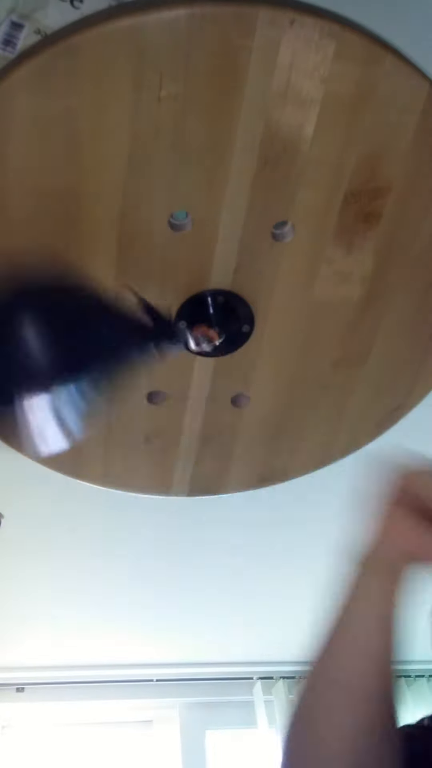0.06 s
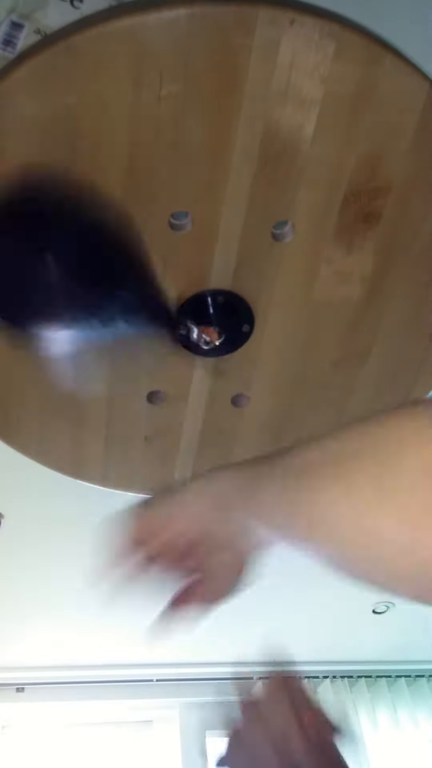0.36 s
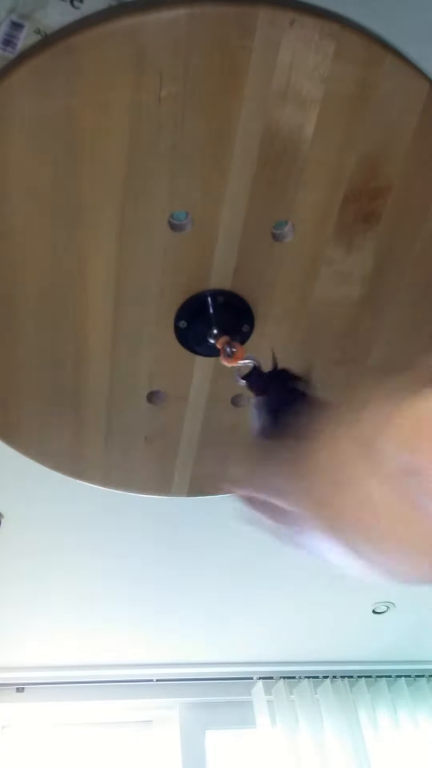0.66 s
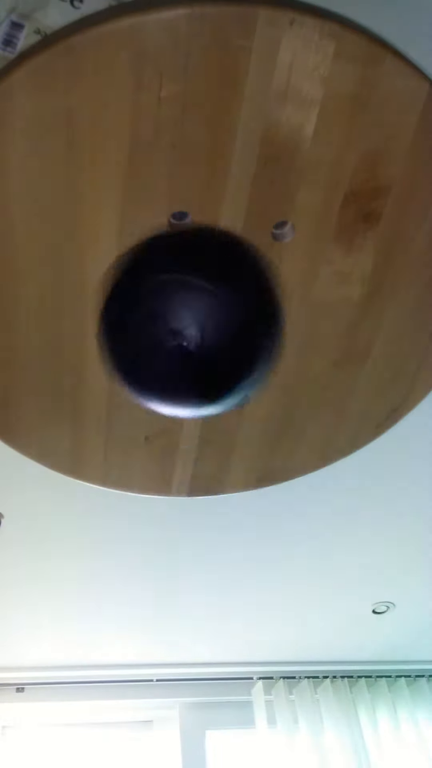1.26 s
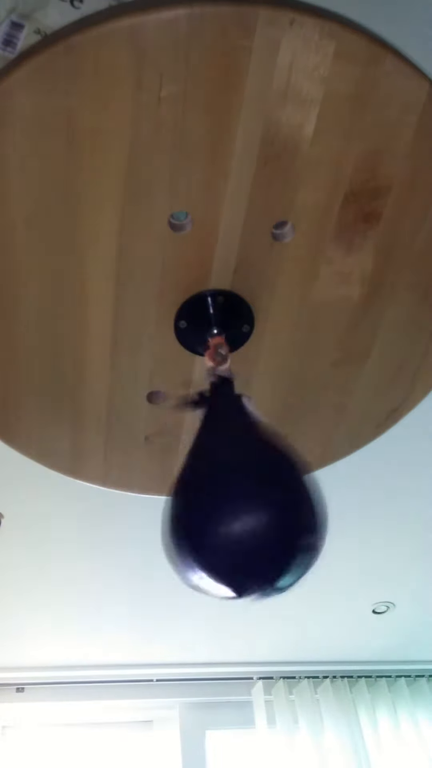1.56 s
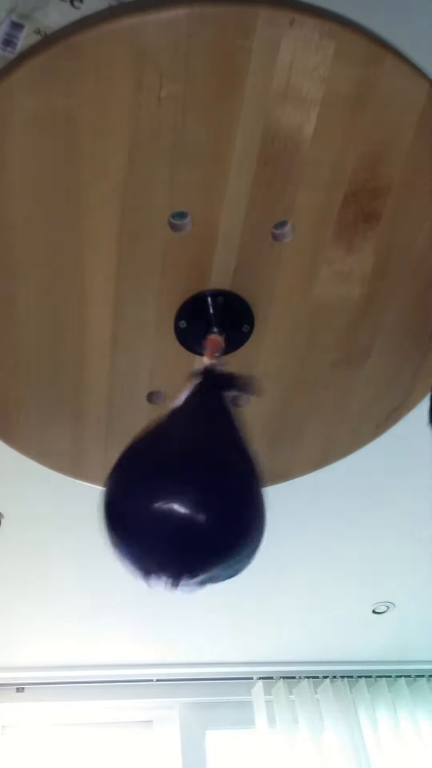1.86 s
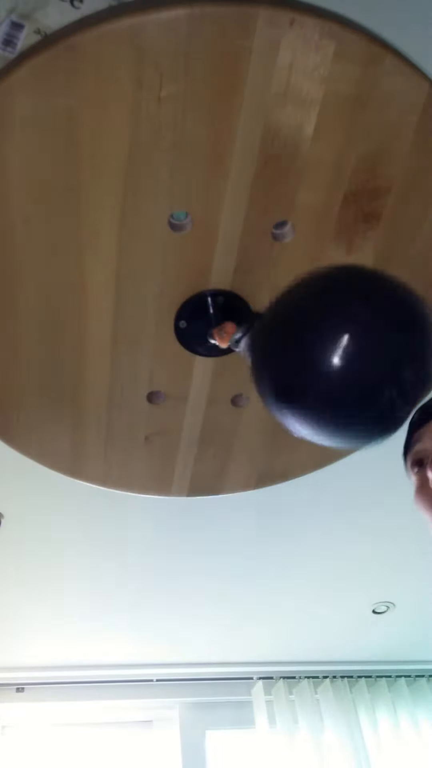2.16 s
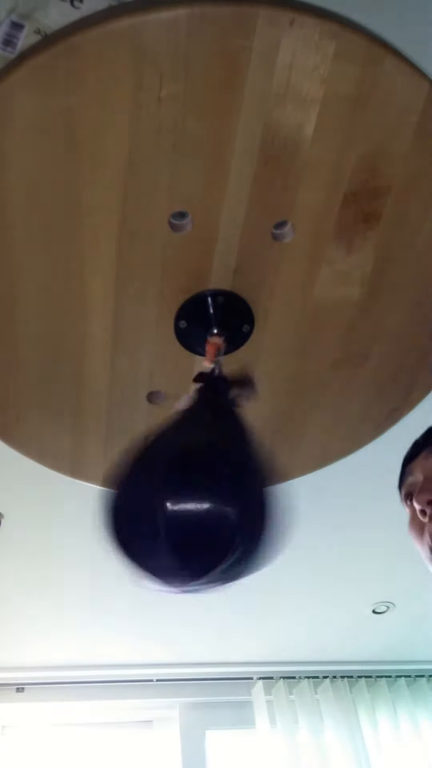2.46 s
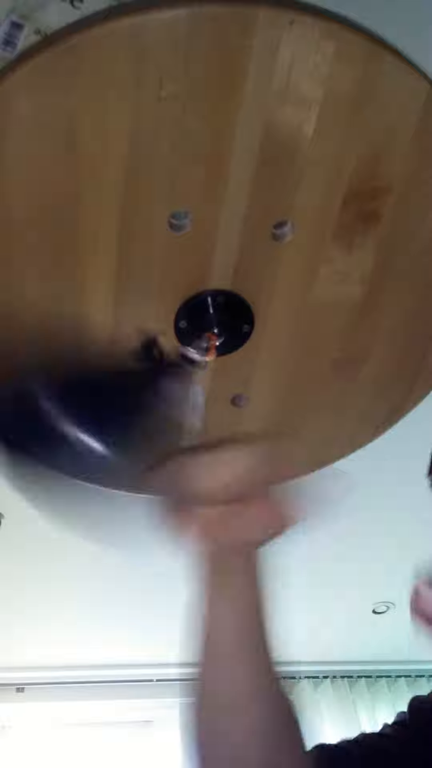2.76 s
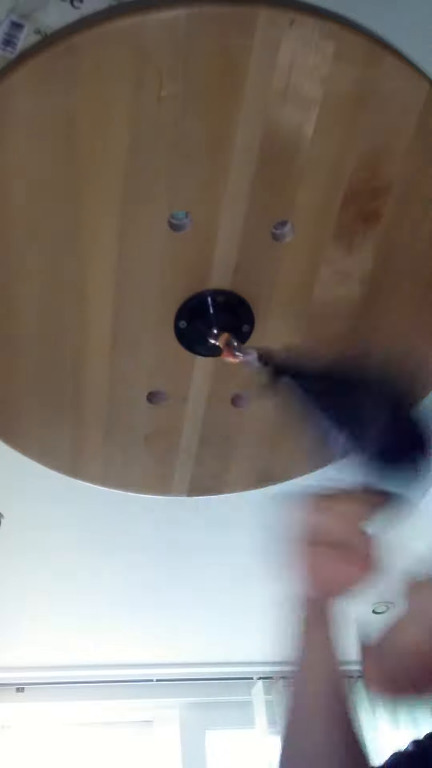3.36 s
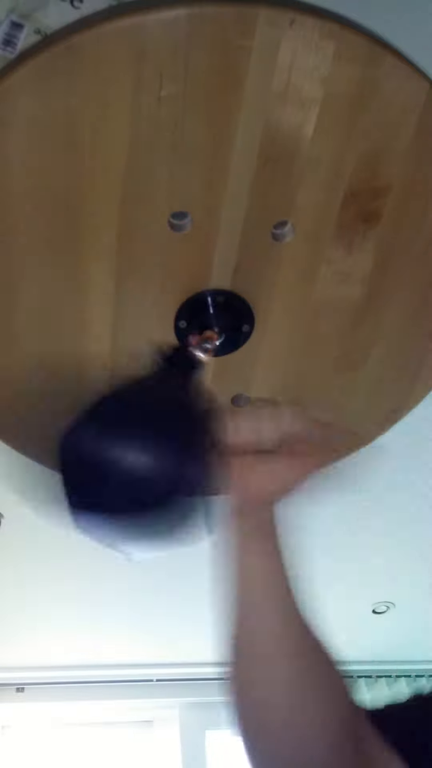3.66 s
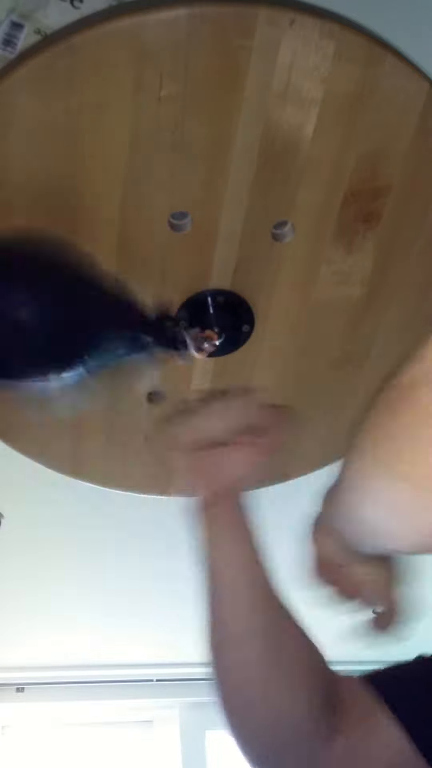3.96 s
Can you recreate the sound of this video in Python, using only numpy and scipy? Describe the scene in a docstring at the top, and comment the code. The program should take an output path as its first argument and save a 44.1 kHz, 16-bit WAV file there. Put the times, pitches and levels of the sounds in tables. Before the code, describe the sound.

Close, rapid punches drive a leather speed bag into a booming wooden board, its metal swivel clinking. The hits stop while the bag swishes softly, then a second run rings around the hard-walled room.

```python
"""In a hard-walled room, a leather speed bag is punched and rebounds under a round wooden board,
close to the microphone. Each blow slaps the leather, thumps the air in the bag, jolts the steel
swivel and sets the board booming, and the walls answer. In the pause between two runs of blows
the bag swings freely with a soft swish over the room's background."""
import sys
import numpy as np
from scipy import signal
from scipy.fft import rfft, irfft, next_fast_len
from scipy.io import wavfile
from scipy.ndimage import uniform_filter1d

SR = 44100
rng = np.random.default_rng(int(sys.argv[2]) if len(sys.argv) > 2 else 0)


def waveform_to_disk(signal):
    """Save audio, clipped to [-1, 1], as 16-bit WAV at the path in sys.argv[1]."""
    frames = np.transpose(np.atleast_2d(signal))
    scaled = np.clip(frames, -1, 1) * 32767
    samples = np.round(scaled).astype(np.int16)
    wavfile.write(sys.argv[1], SR, samples)


N = 176400  # 4 seconds


def amp(db):
    """Turns decibels into a number to multiply a sound by."""
    return 10 ** (np.asarray(db) / 20)


def look_up(points, hz):
    """Reads between the rows of a (frequency, value) table, giving each octave equal space."""
    row_hz, values = np.transpose(points)
    return np.interp(np.log(hz + 1), np.log(row_hz + 1), values)


def add(mix, start_s, sound):
    """Mixes a sound in at its start time."""
    part = mix[:, max(round(start_s * SR), 0):][:, :sound.shape[-1]]
    part += sound[..., :part.shape[1]]


def colour(x, points):
    """Filters by a (frequency [Hz], level [dB]) table without ringing ahead of the sound."""
    size = next_fast_len(x.shape[-1] + 4096)
    hz = abs(np.fft.fftfreq(size, 1 / SR))
    log_gain = np.log(amp(look_up(points, hz)))
    response = np.exp(np.conj(signal.hilbert(log_gain)))[:size // 2 + 1]
    return irfft(rfft(x, size) * response, size)[..., :x.shape[-1]]


def ring(tones, t, detune=0, spread_db=0):
    """Dying tones, with optional chance in pitch and level. A fade time is the time to drop 60 dB."""
    chance = rng.standard_normal((len(tones), 2))
    return sum(amp(db + spread_db * louder - 60 * t / fade_s)
               * np.sin(2 * np.pi * hz * (1 + detune * higher) * t)
               for (hz, db, fade_s), (louder, higher) in zip(tones, chance))


# How alike the two ears' sounds are: (frequency [Hz], likeness [0 to 1])
EAR_LIKENESS = [(150, 0.89), (400, 0.96), (1500, 0.089)]

def stereo_noise(size):
    """Noise that is nearly the same left and right in the bass, but not in the treble."""
    left, other = rfft(rng.standard_normal((2, size)))
    same = np.clip(look_up(EAR_LIKENESS, np.fft.rfftfreq(size, 1 / SR)), -1, 1)
    right = same * left + np.sqrt(1 - same ** 2) * other
    return irfft(np.array([left, right]), size)


# Tone of the room's background: (frequency [Hz], level [dB])
AIR_TONE = [(50, -5.5), (215, -9.5), (278, 2), (340, -6), (520, -9.5), (800, -6.5), (1400, -17.5),
            (2100, -16), (5000, -28)]

def room_air():
    """Steady room air with a soft low drone."""
    return amp(-21) * colour(stereo_noise(N), AIR_TONE)


# Swishes of the bag on its swivel: (time of peak [s], width [s], level [dB])
SWINGS = [(1.84, 0.055, -35.5), (2.32, 0.045, -39), (2.55, 0.24, -42.5)]
# Tone of a swish: (frequency [Hz], level [dB])
SWISH_TONE = [(2000, -25), (8000, -6.5), (16000, -7.5)]

def swinging_bag():
    """Soft rubbing swells and fades while the bag swings freely."""
    t = np.arange(N) / SR
    swells = sum(amp(db) * np.exp(-((t - peak_s) / width) ** 2 / 2) for peak_s, width, db in SWINGS)
    return colour(stereo_noise(N), SWISH_TONE) * swells


# Jolts that make the swivel chatter: (time [s], pitch [Hz], level [dB])
SWIVEL_JOLTS = [(0.443, 9560, -7), (3.3315, 8540, -18.5)]

def swivel_chatter():
    """A quick run of tiny contacts rings the steel."""
    chatter_s, steel_fade_s = 0.002, 0.0056
    t, out = np.arange(SR // 20) / SR, np.zeros((2, N))
    shape = np.exp(-(t / chatter_s) ** 2)
    for start_s, hz, db in SWIVEL_JOLTS:
        contacts = rng.standard_normal(len(t)) * shape
        chatter = signal.fftconvolve(contacts, ring([(hz, 0, steel_fade_s)], t))
        add(out, start_s, amp(db) * chatter * np.linalg.norm(shape) / np.linalg.norm(chatter))
    return out


# Blows that leave the wood ringing: (time [s], pitch [Hz], level [dB])
RINGING_BLOWS = [(0.03, 710, -26), (0.3525, 938, -25), (0.838, 812, -22), (1.054, 890, -21),
                 (2.944, 874, -20.5), (3.083, 720, -24.5), (3.374, 815, -24.5), (3.449, 920, -24)]
# Tones in each ring: (multiple of the pitch [ratio], level [dB], fade time [s])
WOOD_TONES = [(1, 3.5, 0.21), (0.92, -0.5, 0.16)]

def wood_rings():
    """Short wooden tones from the board; the place of contact sets the pitch."""
    t, out = np.arange(SR // 2) / SR, np.zeros((2, N))
    for start_s, hz, db in RINGING_BLOWS:
        tones = [(hz * ratio, db + tone_db, fade_s) for ratio, tone_db, fade_s in WOOD_TONES]
        add(out, start_s, ring(tones, t, spread_db=1.2))
    return out


# Where the wood knock, leather slap and swivel clink sit, in that order: (frequency [Hz])
KNOCK_SLAP_CLINK_HZ = [1100, 3800, 9000]
# How long the echo lasts: (frequency [Hz], fade time [s])
ECHO_FADE = [(200, 0.9), (1000, 0.38), (3000, 0.41)]

def room_echo(t, echo_db, thump_db, knock_db, clink_db):
    """Sound scatters near the board, then the walls answer with a patchy tail, longest in the bass."""
    walls_s, hold_s = 0.012, 0.0059  # when the walls answer; how long the room fills before it fades
    hz, times, spectrum = signal.stft(stereo_noise(len(t)), SR, nperseg=256)
    patches = uniform_filter1d(rng.standard_normal(spectrum.shape[1:]), size=3, axis=0)
    patches = uniform_filter1d(patches, size=8, axis=1)  # smooth in pitch, then in time
    fading_s = np.hypot(times, hold_s) - hold_s
    level_db = 2.5 * patches / patches.std() - 60 * fading_s / look_up(ECHO_FADE, hz)[:, None]
    tail = signal.istft(spectrum * amp(level_db), SR, nperseg=256)[1][:, :len(t)]
    build_up = np.where(t < walls_s, amp(-3.5) * np.sqrt(t / walls_s), 1)
    # The blow's thump (at 300 Hz), knock and clink each tint the echo.
    tint_db = [0.63 * (thump_db - echo_db), 0.19 * (knock_db - echo_db), 0, 0.52 * (clink_db - echo_db)]
    tint = list(zip([300] + KNOCK_SLAP_CLINK_HZ, tint_db))
    return amp(echo_db + 1) * colour(tail * build_up, tint)


def crack(t, knock_db, slap_db, clink_db):
    """Wood, leather and swivel snap for a few milliseconds."""
    rise_s, fall_s = 0.00033, 0.0041
    shape = (1 - np.exp(-t / rise_s)) / (1 + (t / fall_s) ** 3)
    burst = stereo_noise(len(t)) * shape
    burst *= np.linalg.norm(shape) / np.linalg.norm(burst, axis=1, keepdims=True)
    return amp(9.5) * colour(burst, list(zip(KNOCK_SLAP_CLINK_HZ, [knock_db, slap_db, clink_db])))


# Deep tones of the board and its mount: (pitch [Hz], level [dB], fade time [s])
BOOM_TONES = [(63.6, 0, 0.61), (76.2, 0, 0.88), (101.66, 0.5, 0.72)]
# Tones of the bag and the board's middle range: (pitch [Hz], level [dB], fade time [s])
THUMP_TONES = [(154.9, 3.5, 0.15), (186, -8.5, 0.17), (236, 0, 0.068), (295.1, 0.5, 0.17)]

def thump_and_boom(t, boom_db, tilt_db, thump_db):
    """The bag's pressure pulse, then the ringing of bag and board; where it lands tilts the boom."""
    pulse_s, flex_delay_s, rise_s, friction_s = 0.0011, 0.00079, 0.0056, 0.29
    progress = t / pulse_s
    pulse = -progress * (2 - progress) * np.exp(-progress) * amp(thump_db + 1.5)
    ring_t = np.maximum(t - flex_delay_s, 0)
    tilted = [(hz, db + tilt_db * np.log2(hz / 85), fade_s) for hz, db, fade_s in BOOM_TONES]
    # The board's swing builds up, then friction in the mount stops it.
    swing = (1 - np.exp(-ring_t / rise_s)) / np.hypot(1, (ring_t / friction_s) ** 2)
    boom = ring(tilted, ring_t) * swing * amp(boom_db - 4.5)
    thump = ring(THUMP_TONES, ring_t, detune=0.017, spread_db=1.2) * amp(thump_db - 1)
    return pulse + boom + thump


# Tone shared by all cracks: (frequency [Hz], level [dB])
CRACK_TONE = [(450, -10), (870, 13), (1400, -7), (16000, -3.5)]
# Tone the room gives its echo: (frequency [Hz], level [dB])
ECHO_TONE = [(40, -30), (70, 9), (150, 14), (300, 11), (560, 4.5), (880, 11), (1400, 6), (2500, 0.5),
             (16000, -1.5)]
# Blows on the bag: (time [s], board boom [dB], boom tilt [dB per octave], bag thump [dB],
# wood knock [dB], leather slap [dB], swivel clink [dB], room echo [dB])
BLOWS = [(0.0, -6.5, -4, -20.5, -17, -16.5, -21, -19), (0.1734, -22, 2, -22.5, -15.5, -18, -22, -27.5),
         (0.2748, -43, -4, -17.5, -17, -22, -22, -33), (0.3515, -10.5, 5, -12.5, -13.5, -15, -19, -25),
         (0.443, -16, -9, -10, -13.5, -26, -13.5, -31), (0.506, -7, 18.5, -14.5, -17.5, -5, -16.5, -16),
         (0.714, -22, -18, -21.5, -13.5, -16.5, -16, -19), (0.7852, -34, 4, -19.5, -32, -21, -17, -31),
         (0.8372, -10, -3, -18, -10.5, -14, -9, -18.5), (1.053, -19, 7, -23, -22, -16, -20.5, -26.5),
         (1.166, -35, 20, -23.5, -34, -40, -23.5, -32), (2.877, -35, 13, -29, -21.5, -22.5, -22, -33),
         (2.9434, -11.5, 10, -11, -27, -14, -17, -21), (3.0268, -13, -12, -17.5, -13, -20, -16.5, -32),
         (3.045, -14, 8, -26, -14.5, -10, -48, -24.5), (3.0821, -5.5, 3.5, -12, -16, -8.5, -24, -21.5),
         (3.2682, -14, 0, -14.5, -14.5, -19, -16.5, -26), (3.3305, -22, -13, -18.5, -20.5, -24, -18.5, -33),
         (3.3742, -7.5, -10, -18.5, -22.5, -15.5, -16, -20.5),
         (3.4483, -6.5, -10, -14, -16, -15, -10.5, -22.5), (3.492, -6.5, -2, -23, -21, -9.5, -19.5, -14),
         (3.5027, -6.5, -10, -17, -13.5, -19, -22, -18.5), (3.6925, -16.5, -5, -16, -22, -16, -24.5, -26),
         (3.7919, -25.5, -12, -21, -23.5, -20, -18.5, -30), (3.8623, -14, 1, -15, -23.5, -11, -20, -24),
         (3.9382, -20, -25, -15, -23, -25, -21.5, -31.5), (3.995, 0, 13, -12.5, -15, -15, -18, -11)]

def bag_blows():
    """Fist or board strikes the bag, each time with a thump, a crack and the room's answer."""
    t = np.arange(32768) / SR
    thumps, cracks, echoes = np.zeros((3, 2, N))
    for start_s, boom_db, tilt_db, thump_db, knock_db, slap_db, clink_db, echo_db in BLOWS:
        add(thumps, start_s, thump_and_boom(t, boom_db, tilt_db, thump_db))
        add(cracks, start_s, crack(t[:2048], knock_db, slap_db, clink_db))
        add(echoes, start_s, room_echo(t, echo_db, thump_db, knock_db, clink_db))
    return thumps + colour(cracks, CRACK_TONE) + colour(echoes, ECHO_TONE)


def scene():
    """The bag in its room."""
    return bag_blows() + wood_rings() + swivel_chatter() + swinging_bag() + room_air()


def limiter(x):
    """Turns loud moments down at once and recovers within milliseconds."""
    limit_db, share_removed, recover_db_per_s = -8.5, 0.85, 900
    power = uniform_filter1d((x ** 2).mean(0), size=130)
    power_db = 10 * np.log10(abs(power) + 1e-12)
    fall_db = np.arange(N) * recover_db_per_s / SR
    peak_db = np.maximum.accumulate(power_db + fall_db) - fall_db  # jumps up, then sinks steadily
    over_db = np.maximum(peak_db - limit_db, 0)
    return x * amp(-share_removed * uniform_filter1d(over_db, size=60))


# Tone of the microphone's left and right openings: (frequency [Hz], level [dB])
LEFT_MIC_TONE = [(25, -18), (62, -1), (2000, 2), (6500, 3.5), (7800, 8), (8900, 14.5), (10300, 3),
                 (16000, -12)]
RIGHT_MIC_TONE = [(25, -17.5), (62, -3), (900, 2.5), (2000, -6), (6500, -4), (7800, -1), (9200, -10.5),
                  (16000, -23)]

def record(dry):
    """The microphone colours each side; loud peaks are tamed and the highest treble is cut."""
    right_delay_s, cutoff_hz = 0.00021, 15900
    t = np.arange(N) / SR
    late_right = np.interp(t - round(right_delay_s * SR) / SR, t, dry[1])
    x = limiter(np.array([colour(dry[0], LEFT_MIC_TONE), colour(late_right, RIGHT_MIC_TONE)]))
    x = x / (1 + x ** 6) ** (1 / 6)  # soft overload rounds off the peaks
    treble_cut = signal.firwin(511, cutoff_hz, window=("kaiser", 9), fs=SR)
    return signal.oaconvolve(x, treble_cut[None], "same")


dry = scene()
out = record(dry)
waveform_to_disk(out)
```